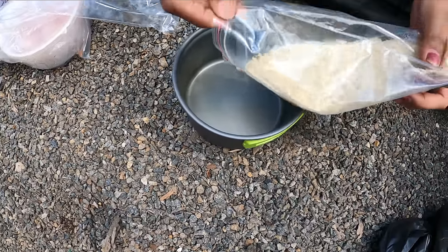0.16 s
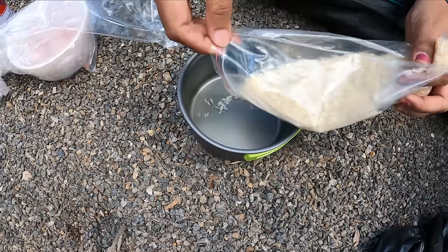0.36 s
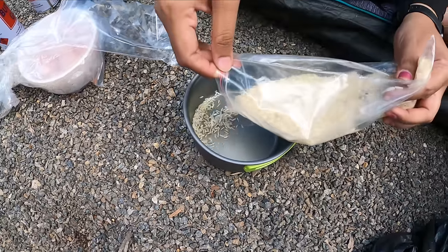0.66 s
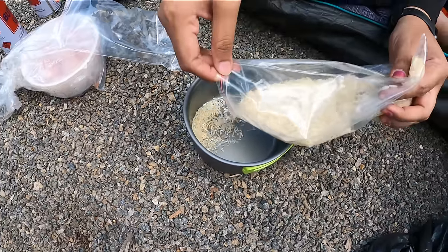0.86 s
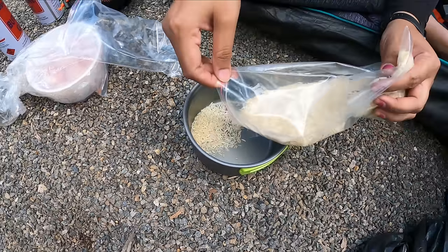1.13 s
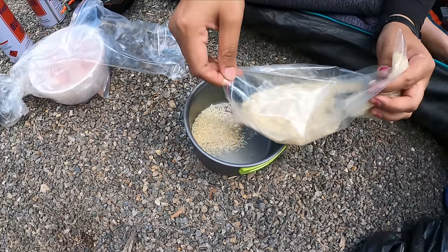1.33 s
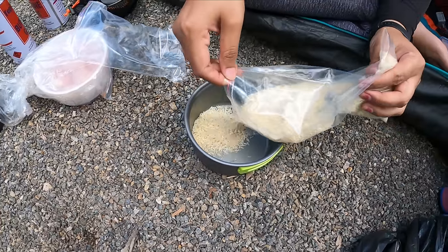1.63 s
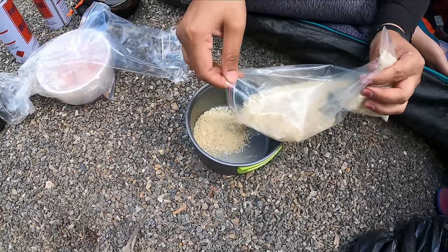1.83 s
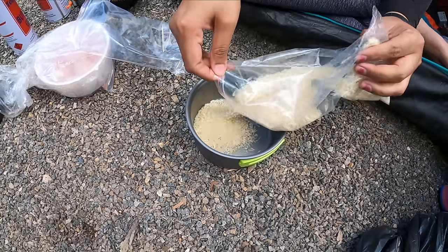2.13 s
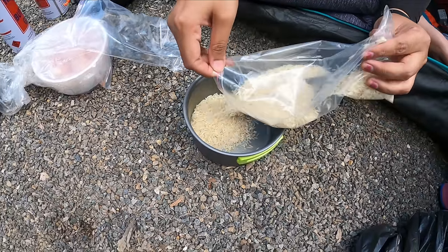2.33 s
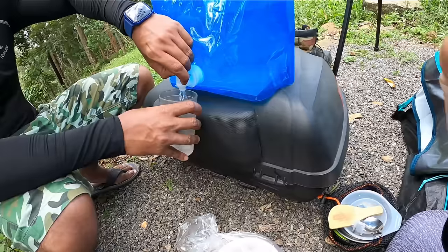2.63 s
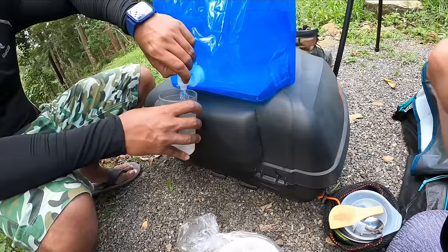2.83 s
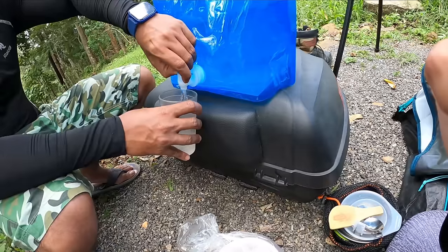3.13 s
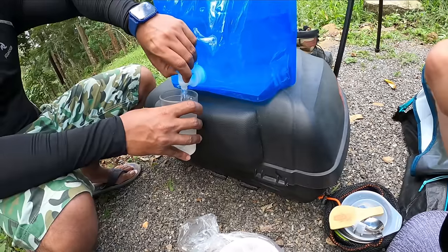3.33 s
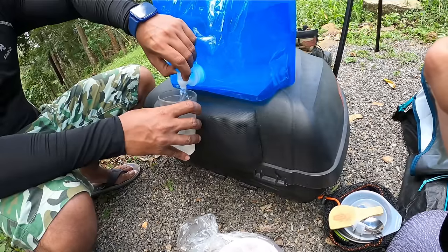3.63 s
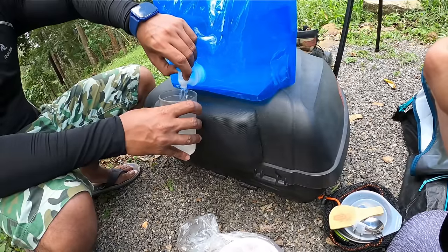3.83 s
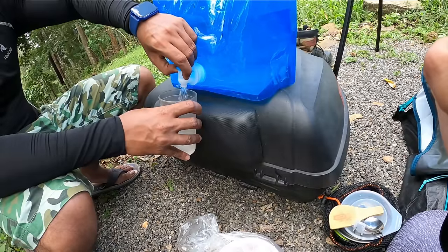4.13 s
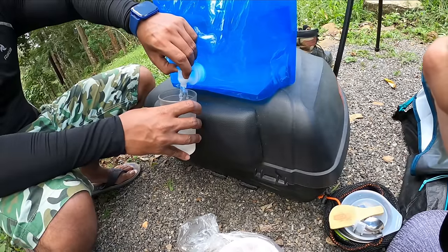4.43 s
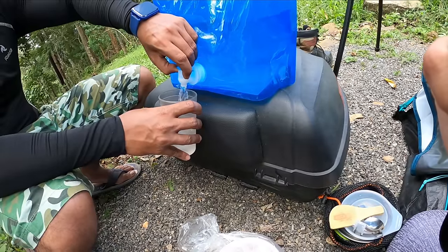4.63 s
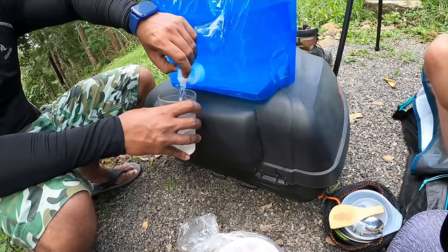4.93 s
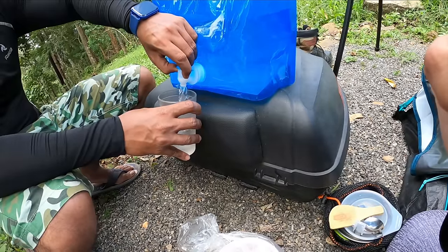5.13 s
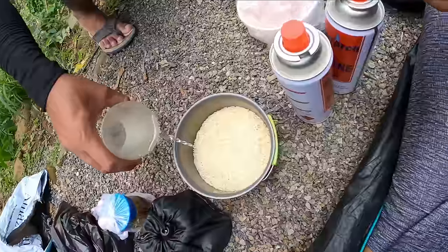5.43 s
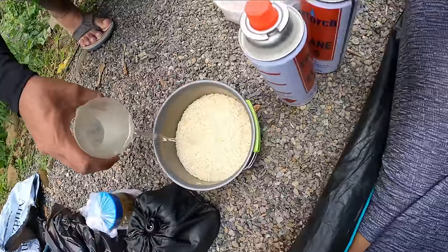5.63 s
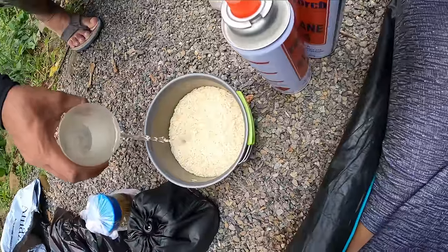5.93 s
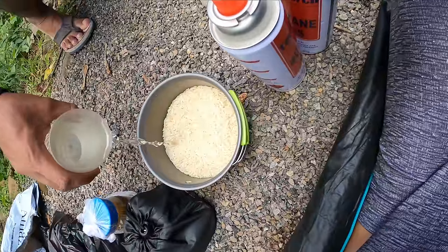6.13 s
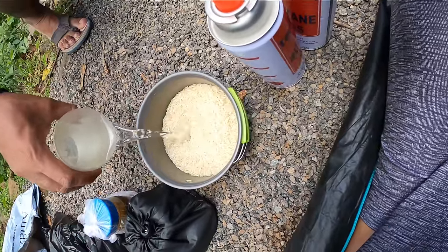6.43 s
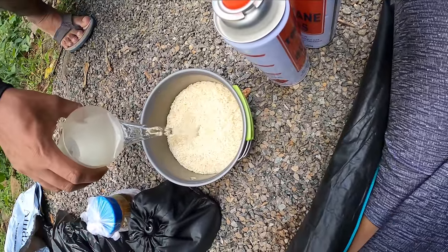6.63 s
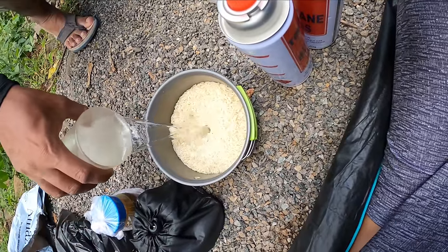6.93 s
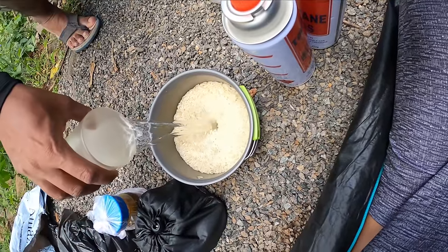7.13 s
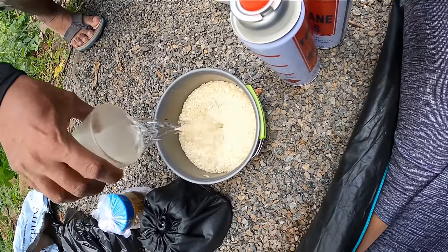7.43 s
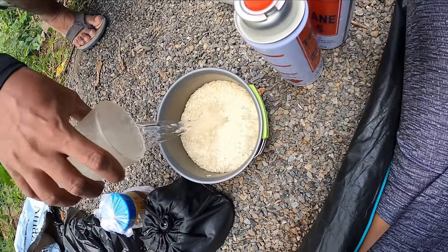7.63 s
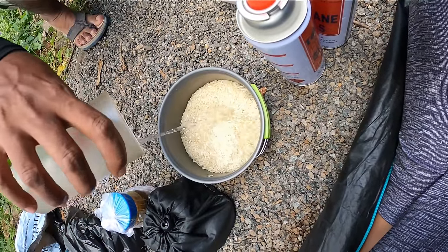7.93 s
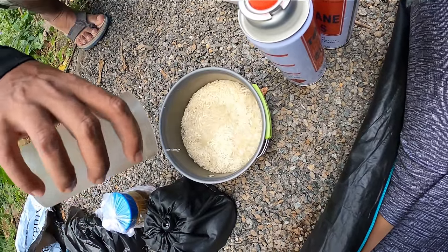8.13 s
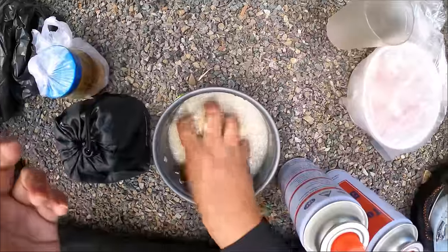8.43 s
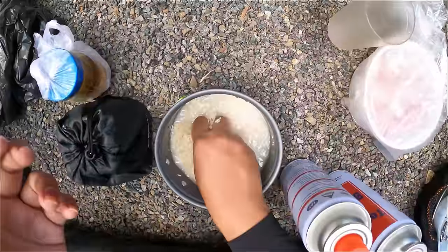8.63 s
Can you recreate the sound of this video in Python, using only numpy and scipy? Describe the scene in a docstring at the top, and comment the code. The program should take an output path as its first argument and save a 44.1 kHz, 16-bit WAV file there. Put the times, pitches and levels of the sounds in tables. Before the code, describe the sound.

Close outdoor sound in three passages parted by short silences. Rice slides from a snapping, crinkling plastic bag and patters into a metal pot, bright and ringing until the heap dulls it. A tap splashes hollowly into a plastic cup, settling into a burble. Drips, then a fizzing stream, land on the rice; finally a brief wet scrape. A faint low rumble lies underneath.

```python
"""Rice and water at a campsite

Three passages, parted by short silences, are heard over a distant low drone and faint hiss.
Dry rice slides from a plastic bag: random impacts excite the resonances of a metal pot until the heap mutes it.
A tap dribbles into a plastic cup: splashes excite the air in the cup and trapped bubbles ring as decaying sines.
The water is dripped, then poured on the rice, as bubble clouds and shaped noise; a hand starts to rinse it."""
import sys
import numpy as np
from scipy import signal
from scipy.io import wavfile
from scipy.ndimage import uniform_filter1d

SR = 44100
rng = np.random.default_rng(int(sys.argv[2]) if len(sys.argv) > 2 else 0)


def wrap_up_sound(samples):
    """Save the sound to the file named by the first command line argument, as 16-bit audio."""
    columns = np.atleast_2d(samples).T
    # keep every value between -1 and 1, then stretch to whole-number steps
    tamed = np.clip(columns, -1, 1)
    steps = np.round(tamed * 32767).astype(np.int16)
    wavfile.write(sys.argv[1], SR, steps)


N = 387153
T = np.arange(N) / SR  # time in seconds

# The three audible passages. Each row: start in seconds, fade-in length in seconds, end in seconds.
PASSAGES = [(-.01, .01, 2.567), (2.775, .075, 8.267), (8.465, .08, 8.8)]

# Spectrum of the distant rumble. Each row: frequency in Hz, relative level in dB.
RUMBLE_SPECTRUM = [(15, -17.5), (30, -12), (48, -7.5), (65, 0), (80, -5), (115, -9), (160, -12.5),
                   (210, -21), (300, -27.5), (400, -41), (800, -62.5)]
# Course of the rumble. Each row: time in seconds, level in dB.
RUMBLE_LEVEL = [(0, -24.5), (.75, -28), (1.15, -31), (1.45, -26), (2.5, -25), (3.5, -24.5), (4.3, -25.5),
                (5.2, -26), (8.2, -27.5)]
# Course of a distant engine-like hum. Each row: time in seconds, level in dB.
HUM_LEVEL = [(0, -38), (2.5, -38), (6.2, -32), (6.8, -26.5), (7.5, -30.5), (8.25, -29), (8.5, -45)]
# Spectrum of the open-air hiss. Each row: frequency in Hz, relative level in dB.
AIR_SPECTRUM = [(200, -6), (450, -1), (650, 2), (900, -1), (1700, 2), (2400, -11), (4000, -17), (7000, -24),
                (10000, -36), (16000, -48)]

# Strokes of the rinsing hand. Each row: start in seconds, length in seconds, peak gain in dB.
HAND_STROKES = [(8.46, 0.93, -37.5), (8.55, 0.074, -45)]
# Spectrum of scraping wet rice. Each row: frequency in Hz, relative level in dB.
WET_RICE_SPECTRUM = [(400, -19), (650, -6), (1000, -2.5), (1350, -2), (1800, -1), (2500, -2), (4500, -5.5),
                     (7000, -7.5), (9000, -17), (14000, -45)]

# The bag is tipped, then lifted and shaken out.
# Each row: time in seconds, gain of rice sliding on the film in dB, gain of the crinkling in dB.
BAG_LEVELS = [(0, -30.5, -62), (.26, -30, -72), (.3, -24.5, -73), (.39, -24, -43.5), (1.55, -29, -45),
              (1.67, -30.5, -49), (2.02, -31.5, -45.5), (2.31, -25, -37.5), (2.58, -30, -38)]
# Spectrum of rice sliding on film. Each row: frequency in Hz, relative level in dB.
SLIDE_SPECTRUM = [(200, -24), (330, -1.5), (600, 3.5), (950, 4), (1350, 1.5), (1700, 3.5), (2400, -4.5),
                  (3800, -2.5), (6000, -12), (10000, -30.5), (16000, -41.5)]
# Spectrum of crinkling film. Each row: frequency in Hz, relative level in dB.
CRINKLE_SPECTRUM = [(500, -14.5), (2000, 3.5), (4000, -4.5), (6500, 1), (7500, -4), (8050, -13.5),
                    (8550, 0.5), (9500, -10.5), (11300, -10.5), (12300, -5), (15500, -11.5)]
# Snaps of the bag. Each row: time in seconds, peak of the thud in dB, peak of the crack in dB.
BAG_SNAPS = [(.057, -16, -36), (.073, -11, -38), (0.173, -18.5, -22.5), (.283, -27, -20), (.376, -5, -30),
             (0.503, -10.5, -16), (1.408, -12.5, -31), (1.583, -42, -13.5), (1.621, -33, -18),
             (2.141, -33, -12), (2.306, -19.5, -11.5), (2.364, -32, -15.5), (2.394, -30.5, -12)]

# The main fall of rice, a rush that thins out. Each row: time in seconds, flow in relative dB.
RICE_FLOW = [(.506, -20.5), (.66, -19.5), (.75, -19), (.9, -19), (.95, -21.5), (1.33, -24), (1.37, -28.5),
             (1.52, -40)]
# Clumps that drop before and after the main rush. Each row: start in seconds, length in seconds, peak flow in dB.
RICE_CLUMPS = [(.407, 0.021, -22), (.433, 0.045, -20), (.474, 0.034, -24), (.5035, 0.0071, -16.5),
               (1.402, .016, -18.5), (1.424, 0.044, -29)]
# Uncovered metal. Each row: time in seconds, share of the grains that hit it from 0 to 1.
BARE_SHARE = [(.4, 0.1), (.6, 0.23), (.85, 0.17), (.97, 0.03), (1.1, 0.02), (1.5, 0)]
# Resonances of the pot. Each row: frequency in Hz, width in Hz, gain in dB.
POT_MODES = [(638, 50, -1.5), (760, 80, -19), (1004, 36, -6), (1934, 67, -9), (2628, 53, 1), (3517, 35, 4),
             (3810, 45, -4), (4520, 52, 2), (4800, 69, 1.5), (5760, 55, -4.5), (5890, 50, 1.5),
             (6380, 52, -13.5), (7080, 98, -4), (7540, 57, -2), (8800, 47, -22.5), (12400, 250, -14),
             (14800, 220, -18.5)]
# Spectrum of rice falling on rice. Each row: frequency in Hz, relative level in dB.
HEAP_SPECTRUM = [(380, -18), (520, -7.5), (640, 6), (1100, -4.5), (1700, 3), (2100, -4), (2600, 4.5),
                 (2900, -3), (3300, 6), (3800, -0.5), (4700, 1), (5400, -5), (7400, -1.5), (8100, -10),
                 (8550, -9.5), (10000, -11), (12400, -7.5), (16000, -8)]

# The air in the cup gulps loudest while the water is shallow.
# Each row: time in seconds, gain of the gulp in dB, resonance in Hz.
CUP_AIR = [(2.81, -36, 750), (3.12, -33, 745), (3.19, -29, 710), (3.33, -21, 690), (3.42, -31.5, 690),
           (3.85, -36.5, 700), (4.25, -37.5, 795), (5.33, -36.5, 810)]
# Deep bubbles that churn for a while. Each row: start in seconds, length in seconds, peak gain in dB.
DEEP_CHURN = [(3.15, 0.94, -33)]
# Spectrum of the splash spray. Each row: frequency in Hz, relative level in dB.
SPRAY_SPECTRUM = [(1400, -4), (1950, 1.5), (2500, -0.5), (2860, -8.5), (3400, 2.5), (4380, 4), (4900, -2),
                  (6100, -2), (8400, -7.5), (10000, -26), (16000, -46)]
# The loudest bubbles trapped in the cup. Each row: time in seconds, peak in dB, frequency in Hz.
CUP_BUBBLES = [(2.8347, -12.5, 738), (2.8706, -13.5, 760), (2.9064, -8, 742), (2.912, -9, 5250),
               (2.9465, -13, 763), (2.954, -5.5, 4460), (2.979, -14.5, 3480), (2.99, -14.5, 840),
               (3.0491, -14, 805), (3.0679, -12, 730), (3.0878, 0.5, 735), (3.145, -13.5, 3400),
               (3.1513, -1, 683), (3.1597, -7, 750), (3.1851, -12, 815), (3.193, -16.5, 590),
               (3.2411, -5, 626), (3.2558, -7, 760), (3.2895, -9.5, 707), (3.3096, -9.5, 715),
               (3.3234, -12, 760), (3.3481, -17, 610), (3.3885, -8.5, 713), (3.4424, -13, 732),
               (3.7599, -13.5, 727), (3.8478, -19, 4530), (4.0736, -15.5, 4800), (4.2555, -18.5, 1050),
               (4.449, -15.5, 3840), (4.398, -15.5, 780), (4.543, -18.5, 870), (4.5803, -17.5, 1136),
               (4.6455, -19.5, 930), (4.8582, -20, 1060), (4.92, -14, 3480), (5.045, -15, 3620),
               (5.0962, -8.5, 4380), (5.1545, -25, 12260), (5.2675, -11.5, 1223)]
# Lumps of water that slap the surface. Each row: time in seconds, peak in dB, frequency in Hz.
WATER_SLAPS = [(2.981, -13.5, 1060), (2.9955, 0, 4530), (3.3885, -23, 700), (3.5378, -9, 696),
               (3.5838, -16, 725), (3.7718, -10.5, 735), (3.8205, -8, 724), (3.8956, -13, 715),
               (4.0975, -12.5, 2800), (4.3659, -13.5, 950), (4.7788, -10, 960), (5.1873, -16, 1150),
               (5.3605, -19, 783)]

# The cup is tipped from drips to a stream and runs empty.
# Each row: time in seconds, splashes per second, gain of the trickle in dB.
POUR_FLOW = [(5.52, 75, -61), (5.8, 190, -42.5), (6.0, 106, -38.5), (6.4, 130, -38.5), (6.62, 1700, -35.5),
             (7.33, 1230, -35), (7.43, 550, -44), (7.9, 680, -40.5), (8.15, 220, -40.5), (8.27, 60, -52)]
# Spectrum of the trickle. Each row: frequency in Hz, relative level in dB.
TRICKLE_SPECTRUM = [(500, -24), (1200, -27), (1750, -1.5), (2300, -1), (3300, -0.5), (4700, -0.5),
                    (7000, -0.5), (8000, -3), (10000, -26), (16000, -48)]
# Spectrum of fizz and fine spatter. Each row: frequency in Hz, relative level in dB.
FIZZ_SPECTRUM = [(1500, -3.5), (4000, 4), (7000, -24.5), (9000, -3.5), (11200, -11.5), (12800, -5),
                 (15500, -10)]
# Spectrum of sloshing water. Each row: frequency in Hz, relative level in dB.
SLOSH_SPECTRUM = [(350, 1.5), (500, -13), (700, 2), (850, -8), (1000, 0.5), (1300, -2), (1700, 1.5),
                  (2300, -10.5), (5000, -4.5)]
# The first water runs down the pot wall. Each row: start in seconds, length in seconds, peak gain in dB.
WALL_WETTING = [(5.6, 0.59, -43)]
# Low glug as the stream digs into the rice. Each row: start in seconds, length in seconds, peak gain in dB.
GLUG_SWELLS = [(6.68, 0.26, -29.5), (6.92, 0.26, -35.5)]
# Single drops landing on the rice and pot, and a few long-ringing bubbles.
# Each row: time in seconds, peak of the ring in dB, frequency in Hz, cycles taken to swell.
WATER_DROPS_AND_PINGS = [(5.548, -30, 3780, 1), (5.897, -22, 1620, 0.45), (5.9179, -10.5, 1870, 1.5),
                         (5.9533, -16, 4800, 2.7), (5.961, -23.5, 1800, 1.9), (5.993, -23.5, 5400, 6.2),
                         (6.0327, -20.5, 2680, 2.5), (6.0715, -14, 3320, 0.98), (6.0828, -15.5, 1930, 1.7),
                         (6.102, -19, 1730, 1.4), (6.1574, -25, 1630, 1.8), (6.1806, -12, 1690, 2.5),
                         (6.1902, -19, 1650, 1.7), (6.234, -20, 1620, 0.57), (6.2655, -15, 1830, 1.2),
                         (6.3396, -19.5, 1990, 1.2), (6.351, -16.5, 2020, 1.4), (7.148, -25, 2270, 3.9),
                         (7.977, -28, 1570, 3.6), (8.105, -24, 2820, 6.8), (8.1142, -13.5, 945, 0.88),
                         (8.1292, -14.5, 2120, 1.5), (8.161, -27, 3600, 3.5), (8.189, -25, 5700, 15),
                         (8.2173, -24.5, 4440, 14)]

HUM_HZ = 133.7
TAP_OPEN_S, TAP_SHUT_S, TAP_CLOSING_S = 2.785, 5.375, 0.078
# the stream splashes hard on the bare bottom until a layer of water cushions it
SPRAY_DB, BARE_CUP_DB, CUSHION_S = -36.5, 6, 0.56
# the burble grows as the cup fills, and fine spatter starts to clear the rim
BURBLE_DB, BURBLE_GROWTH_DB = -37, 3.5
SPATTER_DB, SPATTER_CLEARS_S = -50, 0.91
# deep bubbles sink in pitch towards DEEP_HZ as the water deepens
DEEP_DB, DEEP_HZ, SHALLOW_RISE_HZ, SINK_S = -47, 473.5, 420, 0.39
# single larger bubbles plink over the burble once the water is deep
PLINK_DB, PLINKS_PER_S, PLINK_DEPTH_S = -37, 20, 1.8
RING_CYCLES, SLAP_CYCLES = 3.8, 1.14  # cycles that a trapped bubble or a slap takes to swell
# fizz at a thousand splashes a second, and its growth with their rate
FIZZ_DB, FIZZ_DB_PER_DECADE = -40, 11.5
# water sloshes once it pools on top of the rice, then calms
SLOSH_DB, POOL_S, POOL_DB, CALM_S = -45, 7.36, -39, 0.19
BAND_EDGE_HZ = 15950


def amp(db):
    """Definition of the decibel: twenty dB are a factor of ten in amplitude."""
    return 10 ** (np.asarray(db) / 20)


def unit(x):
    """Power normalisation: the signal is scaled to an RMS of one."""
    return x / np.sqrt(np.mean(x ** 2) + 1e-20)


def follow(rows, column):
    """Linear interpolation: one column of a curve at every sample."""
    rows = np.array(rows)
    return np.interp(T, rows[:, 0], rows[:, column])


def level(rows, column):
    """Gain envelope: a dB column as a gain that is silent outside the curve."""
    inside = (T >= rows[0][0]) & (T <= rows[-1][0])
    return amp(follow(rows, column)) * uniform_filter1d(inside * 1., size=300)


def arches(rows):
    """Half-sine envelope: the gain rises and falls once for each (start, length, peak dB) row."""
    return sum(amp(db) * np.sin(np.pi * np.clip((T - start) / length, 0, 1)) for start, length, db in rows)


def steady(x):
    """Short-time power levelling: slow swells are evened out, single grains keep their contrast."""
    power = uniform_filter1d(uniform_filter1d(x ** 2, size=3500), size=3500)
    return x / np.sqrt(abs(power) + .02 * np.mean(x ** 2))


def add(mix, s, sound):
    """Superposition: a sound is added in place, s seconds into the mix."""
    part = mix[max(round(s * SR), 0):][:len(sound)]
    part += sound[:len(part)]


def colour(x, points, size=4096):
    """Minimum-phase filtering: a causal response with the given (Hz, dB) spectrum, falling beyond its ends."""
    hz, db = np.transpose(points)
    hz = np.r_[hz[0] / 2, hz, hz[-1] * 2]
    db = np.r_[db[0] - 30, db, db[-1] - 30]
    bins_hz = abs(np.fft.fftfreq(size, 1 / SR))
    gain = amp(np.interp(np.log(bins_hz + 1), np.log(hz), db))
    log_gain = np.log(gain.clip(1e-5))
    # the Hilbert transform of the log gain gives the phase
    response = np.fft.ifft(np.exp(np.conj(signal.hilbert(log_gain)))).real
    return signal.oaconvolve(x, response[:size // 2])[:len(x)]


def resonate(x, hz, width):
    """Damped resonance: a fixed or moving mode of gain 1, whose width in Hz sets its decay."""
    r = np.exp(-np.pi * width / SR)
    if np.ndim(hz) == 0:
        return signal.lfilter([1 - r, 0, r - 1], [1, -2 * r * np.cos(2 * np.pi * hz / SR), r * r], x)
    # a moving mode is shifted down to 0 Hz, smoothed and shifted back
    turn = np.exp(2j * np.pi * np.cumsum(hz) / SR)
    return 2 * (turn * signal.lfilter([1 - r], [1, -r], x / turn + 1e-18)).real


def drift(per_s):
    """Random modulation: straight lines join normal random values, per_s of them a second."""
    return np.interp(T * per_s, np.arange(4096), rng.standard_normal(4096))


def impacts(per_s, spread_db):
    """Poisson-like process: randomly timed clicks of either sign, most small and a few large."""
    size = amp(spread_db * np.minimum(rng.exponential(1, N), 4)) * rng.choice([-1, 1], N)
    return size * (rng.random(N) < per_s / SR)


def bubble(hz, swell, rise):
    """Bubble resonance: an air pocket swells, rings and dies, its pitch rising as it nears the surface."""
    u = np.arange(int(8 * swell * SR) + 8) / (swell * SR)
    envelope = (u * np.exp(1 - u)) ** 2
    return envelope * np.sin(2 * np.pi * np.cumsum(hz * (1 + rise * (u - 1.3))) / SR)


def froth(clicks, low_hz, high_hz, cycles, count=40):
    """Superposed bubble resonances: each click starts one small bubble of random size."""
    out, kind = np.zeros(N), rng.integers(0, count, N)
    pitches, stretches = np.geomspace(low_hz, high_hz, count), rng.uniform(.5, 1.5, count)
    shapes = [bubble(hz, cycles * k / hz, .02) for hz, k in zip(pitches, stretches)]
    for i in np.flatnonzero(clicks):
        add(out, i / SR, clicks[i] * shapes[kind[i]])
    return unit(out)


def splashes(per_s, spread_db, decay):
    """Exponential decay of impact energy: splashes swell and die in milliseconds over a steady flow."""
    energy = impacts(per_s, spread_db) ** 2 + 1e-9
    power = signal.lfilter([1], [1, -np.exp(-2 / (decay * SR))], energy)
    return steady(np.sqrt(abs(uniform_filter1d(power, size=70)))) + 0.51


def droplets(strength, cycles):
    """Collective bubble radiation: a splash is a cloud of tiny bubbles over a little hiss."""
    cloud = froth(impacts(2200, 3.5) * strength, 1400, 12000, cycles)
    hiss = strength * rng.standard_normal(N)
    return unit(np.diff(cloud, prepend=0)) + amp(-8) * unit(hiss)


def scatter(x, seconds, size=2200):
    """Diffusion: convolution with a brief decaying noise tail of unit energy."""
    t = np.arange(size) / SR
    tail = rng.standard_normal(size) * np.exp(-t / seconds) * (t > .0006)
    return signal.oaconvolve(x, tail / np.linalg.norm(tail))[:N]


def surroundings():
    """Shaped noise and frequency modulation: low rumble, a wavering hum and faint open-air hiss."""
    rumble = unit(colour(rng.standard_normal(N), RUMBLE_SPECTRUM, size=16384))
    rumble *= amp(follow(RUMBLE_LEVEL, 1))
    hum = np.sqrt(2) * np.sin(2 * np.pi * np.cumsum(HUM_HZ + 1.2 * drift(9)) / SR)
    hum *= amp(follow(HUM_LEVEL, 1) + 0.77 * drift(8.8))
    air = unit(colour(rng.standard_normal(N), AIR_SPECTRUM)) * amp(drift(6.8))
    return rumble + hum + amp(-52.5) * air


def rinse():
    """Granular friction: fingers push through wet rice, which scrapes in clumps and sheds tiny bubbles."""
    clumps = splashes(260, 2.5, .004)
    scrape = steady(colour(impacts(5000, 2.3) * clumps, WET_RICE_SPECTRUM))
    squelch = steady(colour(froth(impacts(900, 3.0), 897, 8000, 4.4), WET_RICE_SPECTRUM))
    hollow = steady(resonate(resonate(scrape, 1560, 216), 1560, 300))
    return arches(HAND_STROKES) * (amp(-1) * scrape + amp(-2.0) * squelch + amp(-12) * hollow)


def bag():
    """Friction and buckling of thin film: rice slides over it, and it crinkles in clumps and snaps."""
    slide = steady(colour(impacts(3500 * amp(2.5 * drift(90)), 2.9), SLIDE_SPECTRUM))
    crinkle = steady(colour(impacts(6000, 1.7) * splashes(170, 3.5, 0.0053), CRINKLE_SPECTRUM))
    free_fall = np.interp(T, [.4, .55, 1.25, 1.46], [0, 1, 1, 0])  # the grains leave the film with less rubbing
    out = amp(-7 * free_fall) * level(BAG_LEVELS, 1) * slide
    out += amp(9.0) * level(BAG_LEVELS, 2) * crinkle
    out *= amp(1.9 * drift(22))
    t = np.arange(900) / SR
    for s, thud_db, crack_db in BAG_SNAPS:
        crack = colour(rng.standard_normal(len(t)) * np.exp(-t / 0.001), CRINKLE_SPECTRUM)
        add(out, s, amp(crack_db) * crack / abs(crack).max())
        add(out, s, amp(thud_db) * bubble(1020, 0.0011, 0))
    return out


def rice():
    """Modal excitation by impact: grains ring the bare pot at first, then tick on the growing heap."""
    grains = impacts(2400 * amp(2 * drift(70)), 2.6)
    hits = steady(grains) * amp(1.4 * drift(45))
    metal = sum(amp(db) * resonate(hits, hz, width) for hz, width, db in POT_MODES)
    # how well the pot radiates: frequency in Hz, gain in dB
    metal = colour(metal, [(430, -16.0), (600, 5.5), (7600, 2.5), (8100, -19), (8500, 0.0), (16000, 0.0)])
    heap = unit(colour(hits, HEAP_SPECTRUM))
    bare = np.clip(follow(BARE_SHARE, 1), 0, 1)
    flow = level(RICE_FLOW, 1) + arches(RICE_CLUMPS)
    return flow * (amp(9.0) * np.sqrt(bare) * unit(metal) + amp(-0.5) * np.sqrt(1 - bare) * heap)


def tap():
    """Cavity and bubble resonance: lumps of the stream splash, excite the air in the cup and shed bubbles."""
    age = np.maximum(T - TAP_OPEN_S, 0)
    running = np.clip(age / 0.012, 0, 1) * np.clip((TAP_SHUT_S - T) / TAP_CLOSING_S, 0, 1)
    fill = np.minimum(age / (TAP_SHUT_S - TAP_OPEN_S), 1)
    lumps = amp(5 * drift(40))
    strength = splashes(130 * lumps, 5.5, 0.0042)
    knocks = impacts(330, 2) * strength

    cup_hz = follow(CUP_AIR, 2)
    gulp = steady(resonate(resonate(knocks, cup_hz, 130), cup_hz, 200))
    deep_hz = DEEP_HZ + SHALLOW_RISE_HZ * np.exp(-age / SINK_S)
    deep = steady(resonate(resonate(impacts(170, 6.7) * strength, deep_hz, 70), deep_hz, 130))
    notes = steady(froth(impacts(120, 2.5) * strength, 950, 1350, 4))
    burble = steady(notes + amp(5.5) * steady(resonate(resonate(knocks, 1130, 170), 1150, 210)))
    plinks = unit(froth(impacts(PLINKS_PER_S, 2.0), 785, 1300, 4.3))

    beads = froth(impacts(300, 3) * strength, 1900, 7000, 4.5)  # single beads chirp out of the cloud
    spray = colour(unit(droplets(strength, 1.9)) + unit(np.diff(beads, prepend=0)), SPRAY_SPECTRUM)
    spatter = colour(impacts(5000, 3) * splashes(110, 6.4, .002), FIZZ_SPECTRUM)
    spray_gain = amp(SPRAY_DB + BARE_CUP_DB * np.exp(-(age / CUSHION_S) ** 2))
    spatter_gain = amp(SPATTER_DB) * np.clip(age / SPATTER_CLEARS_S, 0, 1) ** 4
    splashing = running * (spray_gain * steady(spray) + spatter_gain * steady(spatter))

    out = level(CUP_AIR, 1) * gulp
    out += (arches(DEEP_CHURN) + amp(DEEP_DB) * running) * deep
    out += amp(BURBLE_DB + BURBLE_GROWTH_DB * fill) * running * burble
    out += amp(PLINK_DB) * np.clip(age / PLINK_DEPTH_S, 0, 1) * running * plinks
    gurgle = drift(24)  # the stream wobbles, so the sounds come in clusters
    out *= amp(2.0 * gurgle)
    splashing *= amp(2.1 * gurgle)

    t = np.arange(900) / SR
    events = (CUP_BUBBLES, RING_CYCLES, amp(-23.0)), (WATER_SLAPS, SLAP_CYCLES, amp(-10.5))
    for rows, cycles, splash_gain in events:
        for s, db, hz in rows:
            splash = colour(rng.standard_normal(len(t)) * t * np.exp(-t / 0.0025), SPRAY_SPECTRUM)
            add(splashing, s, amp(db) * splash_gain * splash / abs(splash).max())
            add(out, s, amp(db) * bubble(hz, cycles / hz, .017))
    return out + splashing + amp(-7) * scatter(splashing, .008)


def pour():
    """Bubble entrainment: drops, then a stream that fizzes down between dry grains and pools on top."""
    landings = np.maximum(follow(POUR_FLOW, 1), 1)
    pouring = np.clip((T - POUR_FLOW[0][0]) / 0.29, 0, 1) ** 2 * (T < POUR_FLOW[-1][0])
    surge = amp(1.4 * drift(25))
    strength = splashes(landings * amp(2.5 * drift(60)), 2.4, .0035) * surge

    beads = np.diff(froth(impacts(landings, 2.6), 1626, 7230, 4.9), prepend=0)
    water = steady(droplets(strength, 0.62)) + amp(-4.0) * steady(beads)
    trickle = steady(colour(water, TRICKLE_SPECTRUM))
    fizz = steady(colour(impacts(4000, 2.0) * strength, FIZZ_SPECTRUM))
    fizz *= amp(FIZZ_DB + FIZZ_DB_PER_DECADE * np.log10(landings / 1000))
    slosh = steady(colour(rng.standard_normal(N) * strength, SLOSH_SPECTRUM))
    # a hollow note of the pot
    hollow = steady(resonate(resonate(rng.standard_normal(N) * strength, 1740, 238), 1490, 307))
    slosh += amp(-10.5) * hollow
    slosh *= amp(SLOSH_DB) + amp(POOL_DB) * (T > POOL_S) * np.exp(-abs(T - POOL_S) / CALM_S)
    glug = steady(froth(impacts(160, 4.8), 149.5, 323, 4.1))

    out = level(POUR_FLOW, 2) * trickle + pouring * (fizz + slosh)
    out += arches(WALL_WETTING) * (hollow + amp(-21) * trickle)
    out += arches(GLUG_SWELLS) * glug
    # spectrum of a splat: frequency in Hz, relative level in dB
    splat_spectrum = [(450, -6), (700, 5.5), (1800, -10.0), (5000, -9.5), (9000, -18.0), (16000, -54)]
    t = np.arange(900) / SR
    for s, db, hz, cycles in WATER_DROPS_AND_PINGS:
        splat = colour(rng.standard_normal(len(t)) * np.exp(-t / 0.0023), splat_spectrum)
        add(out, s, amp(db) * bubble(hz, cycles / hz, 0.016))
        # the purer the ring, the less splat
        add(out, s, amp(db - 0.5) / np.sqrt(cycles) * splat / abs(splat).max())
    return out + amp(-10.5) * scatter(out, 0.015)


def scene():
    """Superposition of sources: all near the centre, a very faint diffuse side signal, top treble leaning right."""
    mono = rice() + bag() + tap() + pour() + rinse() + surroundings()
    top = signal.oaconvolve(mono, signal.firwin(61, 11500, pass_zero=False, fs=SR), "same")
    # the left treble adds a randomly flickering, scattered copy
    left_top = amp(-5.0) * (np.roll(top, -1) + scatter(top, .002) * drift(200))
    right_top = amp(7.5) * top
    side = amp(-44) * scatter(mono, .012)
    return mono - top + np.array([left_top + side, right_top - side])


def record(dry):
    """Gating, overload and band limiting: each passage fades in and ends on a cut; peaks clip; treble stops."""
    passages = sum(np.clip((T - start) / fade, 0, 1) ** 2 * (T < end) for start, fade, end in PASSAGES)
    clipped = np.clip(dry * uniform_filter1d(passages, size=60), -1, 1)
    low_pass = signal.firwin(401, BAND_EDGE_HZ, window=("kaiser", 9), fs=SR)
    return signal.oaconvolve(clipped, low_pass[None], "same", axes=1)


dry = scene()
out = record(dry)
wrap_up_sound(out)
```